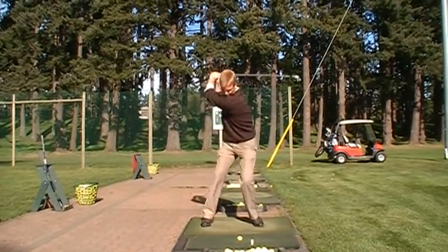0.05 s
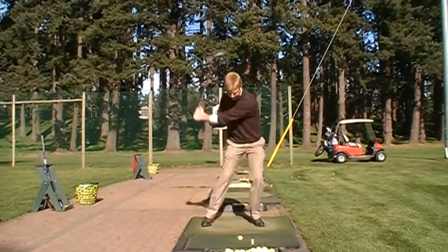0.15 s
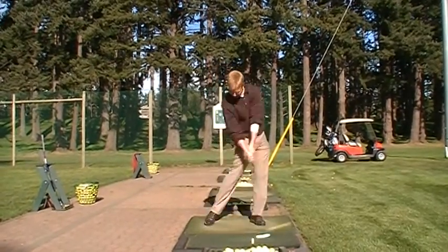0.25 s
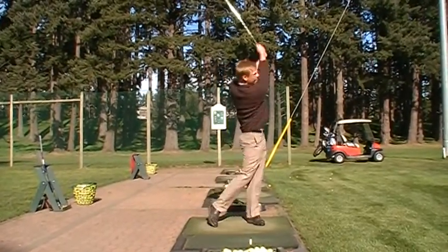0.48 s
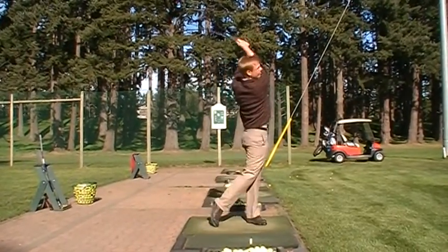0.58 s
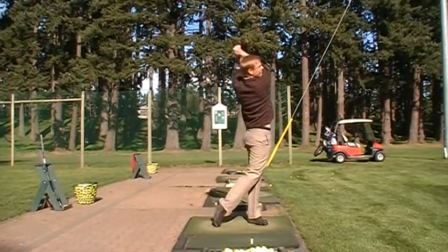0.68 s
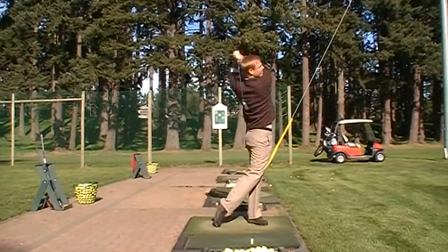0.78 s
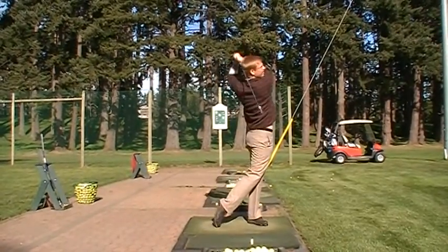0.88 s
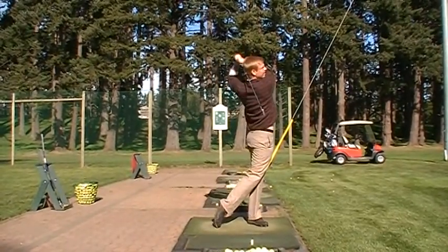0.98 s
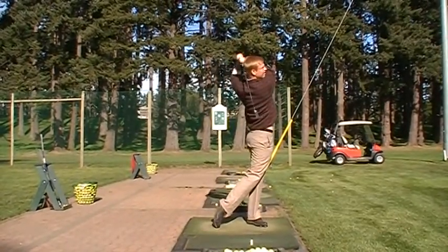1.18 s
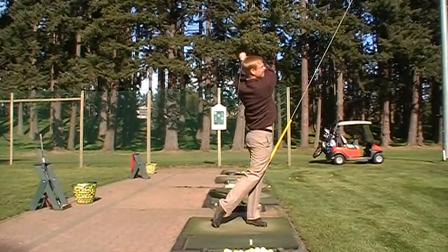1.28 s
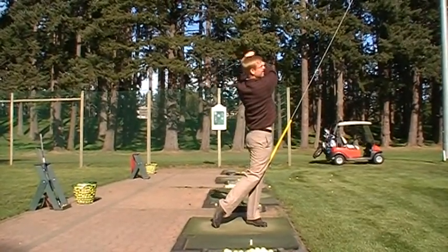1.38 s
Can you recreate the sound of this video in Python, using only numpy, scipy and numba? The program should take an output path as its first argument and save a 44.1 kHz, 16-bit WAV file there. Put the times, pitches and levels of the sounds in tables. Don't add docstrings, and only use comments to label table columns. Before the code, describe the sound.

A golf club hits a ball: a very short rising whoosh, a mat scuff and a loud dry crack, followed by faint ticks, a soft far echo and low wind, heard from a few metres outdoors.

```python
import sys
import numpy as np
from scipy import signal
from scipy.io import wavfile
from scipy.ndimage import uniform_filter1d
from numba import njit

SR = 44100
rng = np.random.default_rng(int(sys.argv[2]) if len(sys.argv) > 2 else 0)


def voltage_ratio(level):
    return 10 ** (np.asarray(level, float) / 20)


def wav_out(sig):
    wavfile.write(sys.argv[1], SR, np.round(np.clip(np.atleast_2d(sig).T, -1, 1) * 32767).astype(np.int16))


N = 63945
FAR_ATTACK_S = 0.00035


def seconds():
    return np.arange(N) / SR


def curve(table, axis):
    points = np.array(table, float)
    return np.interp(seconds(), points[:, 0], points[:, axis])


def lowpass(x, order, hz):
    return signal.lfilter(*signal.butter(order, hz, fs=SR), x)


def highpass(x, order, hz):
    return signal.lfilter(*signal.butter(order, hz, "high", fs=SR), x)


@njit
def svf(x, hz, width):
    y, band_state, low_state = np.empty(len(x)), 0., 0.
    for i in range(len(x)):
        g = np.tan(np.pi * hz[i] / SR)
        damping = width[i] / hz[i]
        v = (band_state + g * (x[i] - low_state)) / (1 + g * (g + damping))
        band_state = 2 * v - band_state
        low_state = low_state + 2 * g * v
        y[i] = damping * v
    return y


def band(hz, width):
    hz = hz + np.zeros(N)
    width = np.clip(width, 15, None) + np.zeros(N)
    noise = svf(svf(rng.standard_normal(N), hz, width), hz, width)
    return noise / np.sqrt(np.pi / 2 * width / SR)


def walk(rate):
    hold = int(SR / rate)
    steps = np.repeat(rng.standard_normal(N // hold + 1), hold)
    return 1.87 * uniform_filter1d(uniform_filter1d(steps, hold), hold)[:N]


def bands(colour, flicker_db, rate, tilt_db=0):
    points, out, power = np.array(colour, float), 0, 0
    for hz in 30 * 2 ** np.arange(0, 9.1, 1 / 3):
        if hz > points[0, 0]:
            density_db = np.interp(np.log(hz), np.log(points[:, 0]), points[:, 1])
            db = density_db + 10 * np.log10(hz)
            power += voltage_ratio(db) ** 2
            level_db = db + tilt_db * np.log2(hz / 2000) + flicker_db * walk(rate)
            out = out + voltage_ratio(level_db) * band(hz, hz * 0.33)
    return out / np.sqrt(power)


def ring(at_s, hz, t60, attack_s, hold_s=0):
    t = np.clip(seconds() - at_s, 0, None)
    fade = np.exp(-np.log(1000) * np.clip(t - hold_s, 0, None) / t60)
    return np.sin(2 * np.pi * hz * t) * fade * (1 - np.exp(-t / attack_s))


def crack():
    # pitch_hz, level_db, t60_s
    face = [(7760, -8.5, 0.0029), (9500, -12.5, .003), (3770, -10.5, .005), (5600, -15.5, 0.0055),
            (2700, -4.5, 0.0016), (6500, -29.5, .004), (1500, -16.5, 0.0015), (11530, -12.5, 0.0025),
            (807, -16.5, 0.0046), (15000, -34, 0.0017)]
    # delay_ms (negative = before the crack),
    # level_db, dullness (0-1)
    arrivals = [(0, 0, 0), (-1.4, -12, .9), (3.0, -14, .9), (4.2, -15, .8), (5.8, -22, .1),
                (11.3, -21, .15)]
    strike_s, attack_s, contact_s = 0.29722, 0.00005, 0.00076
    hit = 0
    for delay_ms, level_db, dull in arrivals:
        for k, (hz, db, t60) in enumerate(face):
            loss_db = 30 * dull * np.log2(max(hz / 2500, 1))
            hold_s = contact_s * (k == 0)
            mode = ring(strike_s + delay_ms / 1000, hz, t60, attack_s, hold_s)
            hit = hit + (-1) ** (k + 1) * voltage_ratio(level_db + db - loss_db) * mode
    return highpass(hit, 2, 330)


def shaft_tone():
    # start_s, pitch_hz, level_db
    shaft = [(.218, 417, -46), (.238, 497, -38.5), (.250, 568, -26), (.256, 625.5, -36), (.261, 713, -26.5),
             (.268, 687.6, -44), (.276, 692, -26.5), (.294, 687, -31), (.303, 609, -51)]
    wobble, width_hz, noise_db = 0.025, 370, -9
    hz = curve(shaft, axis=1)
    phase = 2 * np.pi * np.cumsum(hz * (1 + wobble * walk(250))) / SR
    tone = np.sqrt(2) * np.sin(phase)
    return voltage_ratio(curve(shaft, axis=2)) * (tone + voltage_ratio(noise_db) * band(hz, width_hz))


def head_rush():
    # start_s, level_db, brightness_db_per_octave
    head = [(.215, -59, -3.5), (.245, -40.5, -3.5), (.262, -34, -3.5), (.272, -27.5, -4), (.285, -39.5, 0),
            (.294, -32.5, -5.5), (.302, -35, 1), (.309, -42.5, -4.5), (.318, -56.5, -4)]
    # pitch_hz, density_db_per_hz
    head_colour = [(530, -10.5), (900, -4.5), (2150, -5), (3360, -5), (4210, -6), (6580, -4.5), (8940, -5),
                   (15000, -50.5)]
    return voltage_ratio(curve(head, axis=1) + 4.5) * bands(head_colour, 1.03, 150, curve(head, axis=2))


def edge_whistles():
    # pitch_hz, glide_hz_per_s, centre_s, spread_s, level_db
    edge_tones = [(2145, 19998.5, .268, .004, -29.5), (1737, 3998.5, .281, 0.004, -31.5),
                  (1627, 3000, .253, .005, -38.5), (1200, -5000, .279, .004, -32)]
    whistles = 0
    for hz, glide, centre_s, spread_s, db in edge_tones:
        t = seconds() - centre_s
        envelope = np.exp(-0.5 * (t / spread_s) ** 2)
        whistles = whistles + voltage_ratio(db) * envelope * np.sin(2 * np.pi * (hz + glide * t / 2) * t)
    return whistles


def mat_scuff():
    # pitch_hz, width_hz, level_db
    scuff_bands = [(4450, 900, 3), (6610, 620, -1), (8800, 3600, -2.5)]
    peak_s, rise_s, fall_s, scuff_db = 0.2792, 0.0007, 0.0053, -25
    t = seconds() - peak_s
    shape = np.exp(np.minimum(t / rise_s, -t / fall_s))
    return shape * sum(voltage_ratio(scuff_db + db) * band(hz, width) for hz, width, db in scuff_bands)


def swing():
    t = seconds()
    gate = np.clip((t - 0.218) / 0.0186, 0, 1) * np.clip((0.322 - t) / 0.0033, 0, 1)
    flow = gate * (shaft_tone() + head_rush())
    return lowpass(flow + edge_whistles() + mat_scuff(), 6, 13500)


def far_wall():
    # arrival_s, level_db, centre_hz
    wall = [(.5620, -21, 1150), (.5665, -36, 1100), (.5727, -27, 1400), (.5762, -36, 1500)]
    wash_db, wash_t60_s, wash_hz, wash_width_hz = -41, 0.12, 1210, 1600
    pulse_cycles, skew_rad = 0.31, -0.9
    t = seconds()
    late = t - wall[0][0]
    fade = voltage_ratio(wash_db - 60 * np.abs(late) / wash_t60_s)
    wash = np.clip(late / 0.01, 0, 1) * fade * band(wash_hz, wash_width_hz)
    pulses = 0
    for s, db, hz in wall:
        envelope = np.exp(-0.5 * ((t - s) * hz / pulse_cycles) ** 2)
        pulses = pulses + voltage_ratio(db) * envelope * np.cos(2 * np.pi * hz * (t - s) + skew_rad)
    return wash + highpass(pulses, 2, 280)


def far_ball():
    # start_s, level_db, pitch_hz, t60_s
    far = [(1.3505, -35.5, 1077, .010), (1.3497, -35, 1690, .004), (1.3512, -38, 2180, 0.0089),
           (1.3513, -41, 3300, 0.0033), (1.3505, -42, 680, 0.007), (1.358, -41.5, 923, 0.053)]
    contact_s = 0.0028
    ball = sum(voltage_ratio(db) * ring(s, hz, t60, FAR_ATTACK_S, contact_s * (k == 0))
               for k, (s, db, hz, t60) in enumerate(far))
    return highpass(ball, 2, 280)


def far_ball_side():
    # start_s, level_db, pitch_hz, t60_s
    side_mode = (1.3505, -40, 1500, .012)
    s, db, hz, t60 = side_mode
    return voltage_ratio(db) * ring(s, hz, t60, FAR_ATTACK_S)


def rustle():
    # start_s, level_db
    rustle_level = [(0.0, -73.5), (0.152, -70), (0.294, -52.5), (0.46, -55), (0.622, -57), (0.802, -65.5),
                    (1.028, -76.5), (1.45, -74.5)]
    # pitch_hz, density_db_per_hz
    rustle_colour = [(880, -38.5), (1500, -0.5), (1740, -2), (2570, -4.5), (2830, -3.5), (4270, -10.5),
                     (7670, -10.5), (15500, -56.5)]
    level = voltage_ratio(curve(rustle_level, axis=1) + 6)
    return level * bands(rustle_colour, 0.61, 40) * voltage_ratio(1.1 * walk(199.6))


def ticks():
    # start_s, level_db, pitch_hz
    tick_events = [(0.0657, -42, 6860), (0.0787, -39, 6900), (0.1057, -38.5, 7540), (0.194, -47, 8470),
                   (0.3696, -30.5, 7250), (0.4414, -51, 7670), (0.4803, -30.5, 6800), (0.4973, -31.5, 6000),
                   (0.5964, -40.5, 7410), (0.6504, -50, 7420), (0.6664, -39, 7800), (0.6854, -45, 6680),
                   (0.7143, -41, 4680), (0.7387, -40, 4114), (0.822, -37, 6570), (1.0011, -44.5, 4380),
                   (1.2825, -48.5, 8130)]
    t60_s, rise_s, width_hz = 0.012, 0.00093, 3600
    t, out = seconds(), 0
    for s, db, hz in tick_events:
        fade = voltage_ratio(db - 6.5 - 60 * np.abs(t - s) / t60_s)
        out = out + fade * np.clip((t - s) / rise_s, 0, 1) * band(hz, width_hz)
    return out


def cloth():
    end_s, hz, width_hz, level_db = 0.2, 7190, 3500, -68
    return voltage_ratio(level_db + 1.5 * walk(40)) * np.exp(-(seconds() / end_s) ** 4) * band(hz, width_hz)


def insect():
    centre_s, length_s, hz, width_hz, level_db = 1.34, 0.033, 8160, 149.5, -81.5
    return voltage_ratio(level_db) * np.exp(-((seconds() - centre_s) / length_s) ** 4) * band(hz, width_hz)


def traffic():
    # pitch_hz, density_db_per_hz
    traffic_colour = [(35, -84), (60, -55.5), (130, -4), (315, -15.5), (360, -28.5), (550, -5), (606, -10),
                      (1040, -5), (6000, -39), (7800, -61), (13200, -120)]
    return voltage_ratio(-51) * bands(traffic_colour, 0.39, 6.7)


def port_wind():
    # pitch_hz, density_db_per_hz
    wide_colour = [(18, -53), (30, -27), (90, -2.5), (152, -6), (277, -15.5), (691, -23.5), (1440, -25.5),
                   (8280, -46.5), (15500, -49.5)]
    # start_s, level_db
    gust_level = [(0, 1), (.15, 6), (.28, 3), (.5, -5), (.7, -6), (.93, -7.5), (.99, 5.5), (1.05, -4),
                  (1.1, 5), (1.21, 12.5), (1.27, 3.5), (1.33, 11), (1.45, -0.5)]
    wide = voltage_ratio(-51) * bands(wide_colour, 2.5, 14.62)
    wind = lowpass(wide, 2, 350)
    gusts = wind * voltage_ratio(curve(gust_level, axis=1) + 2.4 * walk(30))
    return wide - wind, gusts


def hiss():
    return voltage_ratio(-76) * band(7000, 9000)


def scene():
    lean_db, lean_hz, lean_top_db = -14, 1800, -28.5
    lag_db, lag_low_hz = -9.5, 6800
    wind_leak_db, wind_low_hz = -13.5, 50
    mid = swing() + crack() + far_wall() + far_ball()
    mid = mid + rustle() + ticks() + cloth() + insect() + traffic() + hiss()
    low = lowpass(mid, 1, lean_hz)
    air, gusts = port_wind()
    side = air + gusts + far_ball_side()
    side = side - voltage_ratio(lean_db) * low - voltage_ratio(lean_top_db) * (mid - low)
    treble = signal.filtfilt(*signal.butter(3, lag_low_hz, "high", fs=SR), mid)
    side = side + voltage_ratio(lag_db) * np.gradient(treble)
    mid = mid + voltage_ratio(wind_leak_db) * highpass(gusts, 1, wind_low_hz)
    return np.array([mid + side, mid - side])


def top_cut(x):
    return signal.sosfilt(signal.butter(12, 16810, fs=SR, output="sos"), x)


def record(dry):
    port_hz, port_width_hz, port_db, mic_top_hz = 7130., 2100., -10.5, 15000
    duck_s, duck_db, attack_s, release_s = 0.299, -26.5, 0.033, 0.071
    ceiling = 0.9
    hz, width = np.full(N, port_hz), np.full(N, port_width_hz)
    mic = np.array([x + voltage_ratio(port_db) * svf(x, hz, width) for x in dry])
    mic = lowpass(mic, 2, mic_top_hz)
    t = np.clip(seconds() - duck_s, 0, None)
    gain_db = duck_db * (1 - np.exp(-t / attack_s)) * np.exp(-t / release_s)
    mix = ceiling * np.tanh(mic * voltage_ratio(gain_db) / ceiling)
    return top_cut(mix)


dry = scene()
out = record(dry)
wav_out(out)
```